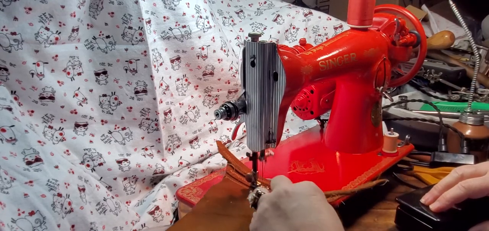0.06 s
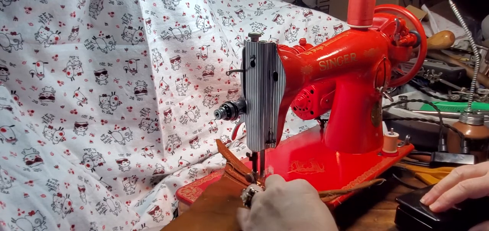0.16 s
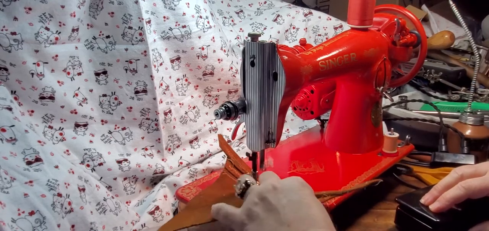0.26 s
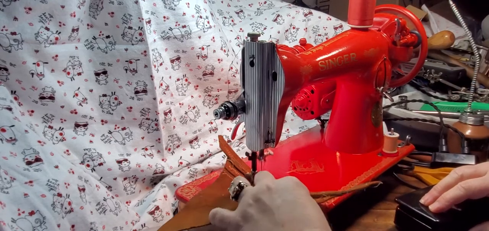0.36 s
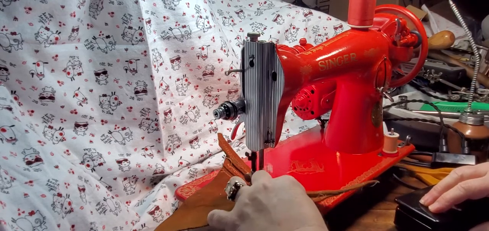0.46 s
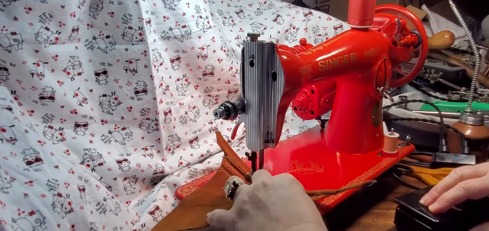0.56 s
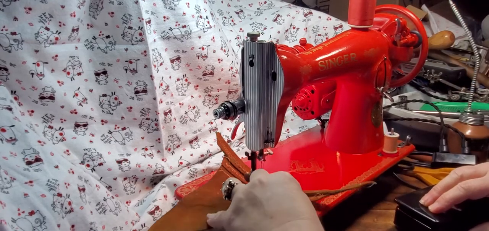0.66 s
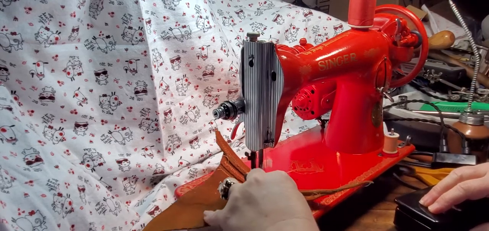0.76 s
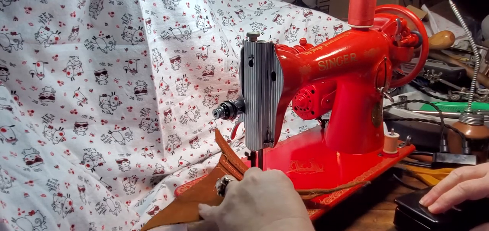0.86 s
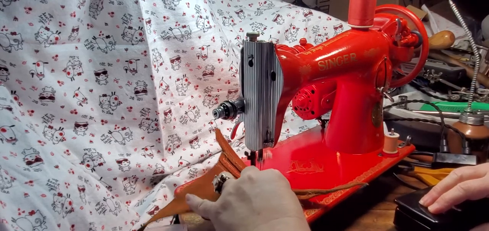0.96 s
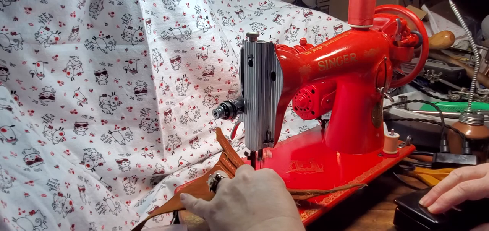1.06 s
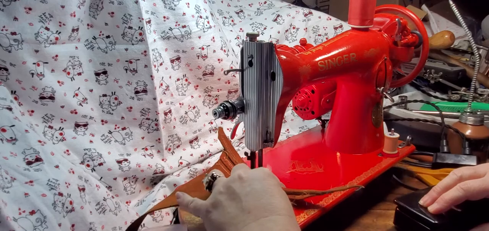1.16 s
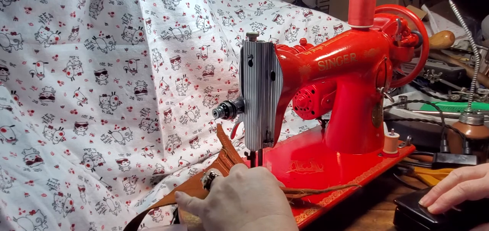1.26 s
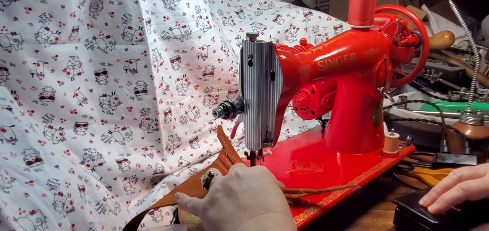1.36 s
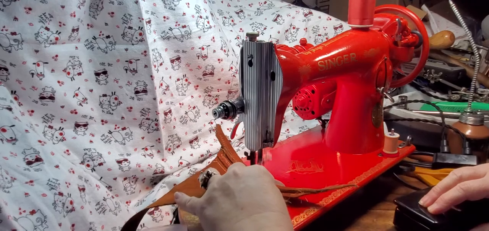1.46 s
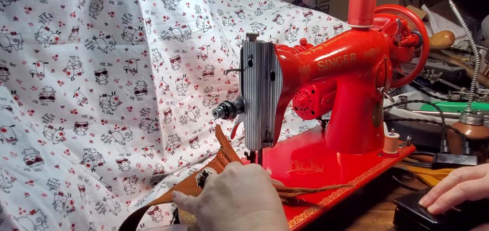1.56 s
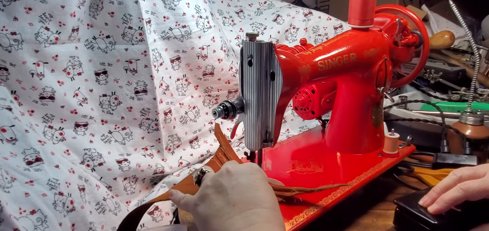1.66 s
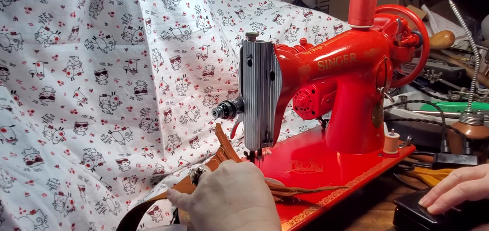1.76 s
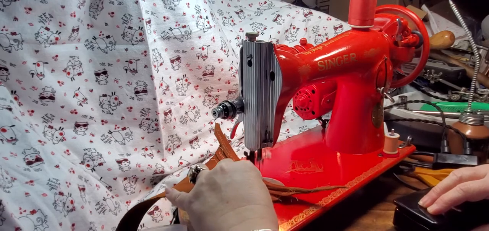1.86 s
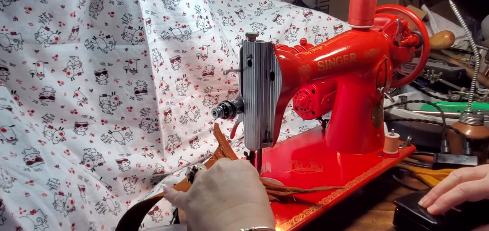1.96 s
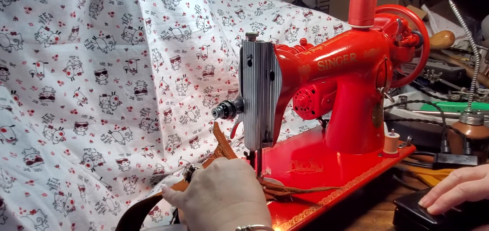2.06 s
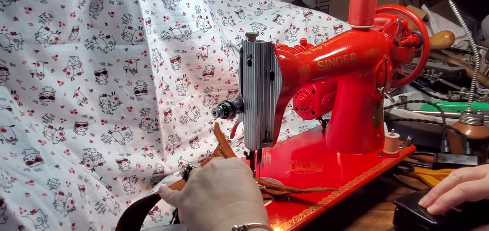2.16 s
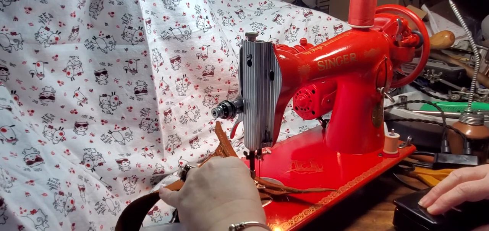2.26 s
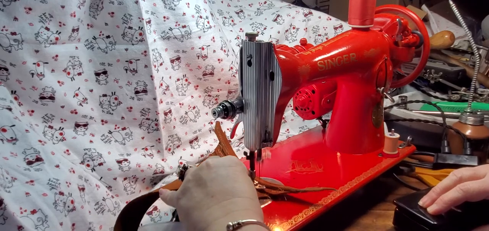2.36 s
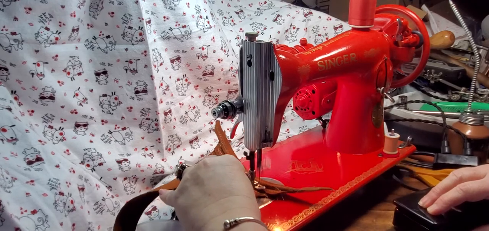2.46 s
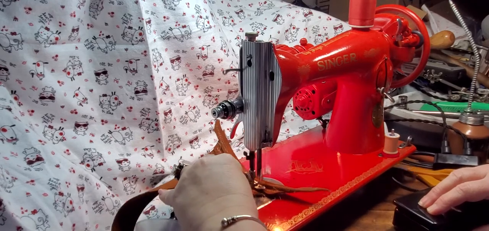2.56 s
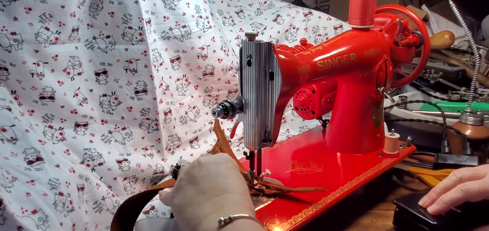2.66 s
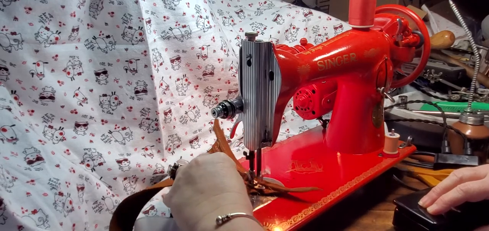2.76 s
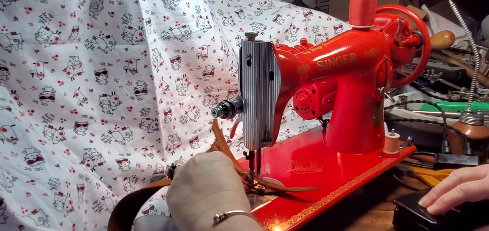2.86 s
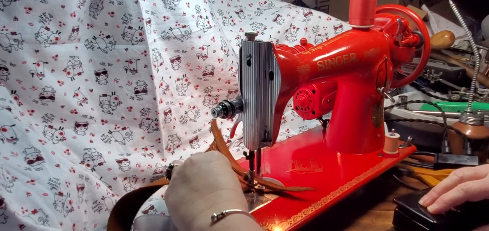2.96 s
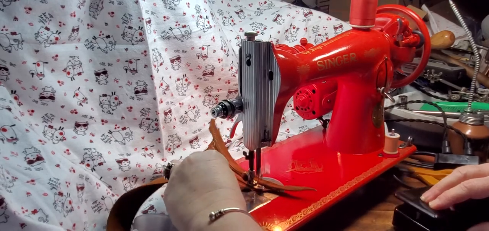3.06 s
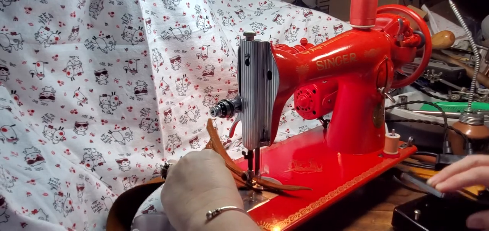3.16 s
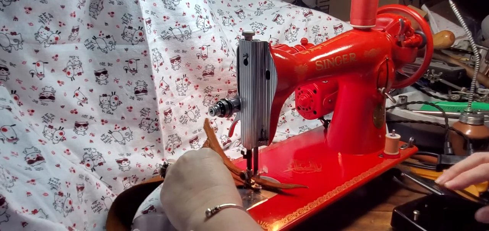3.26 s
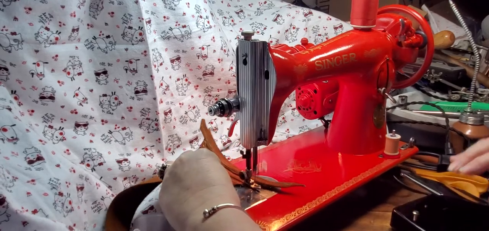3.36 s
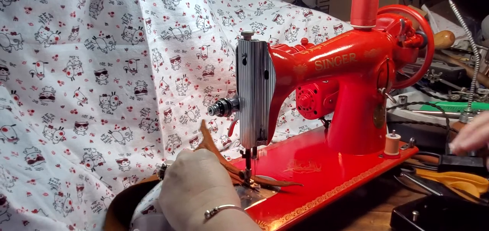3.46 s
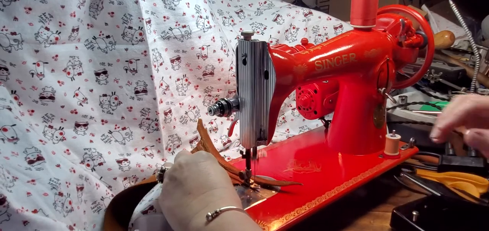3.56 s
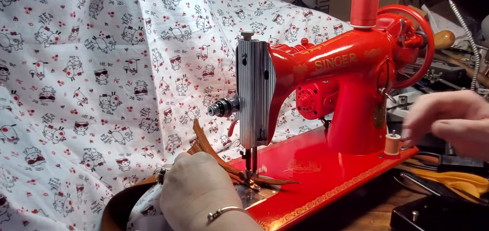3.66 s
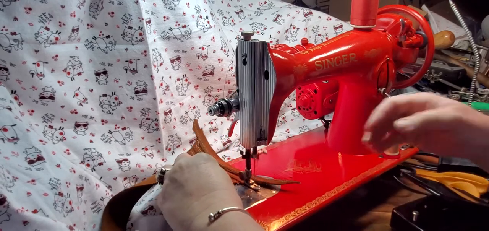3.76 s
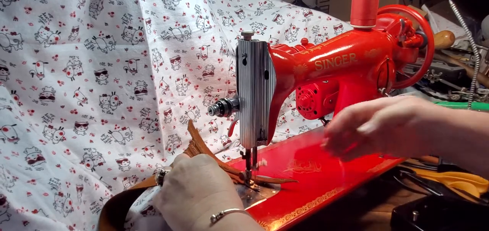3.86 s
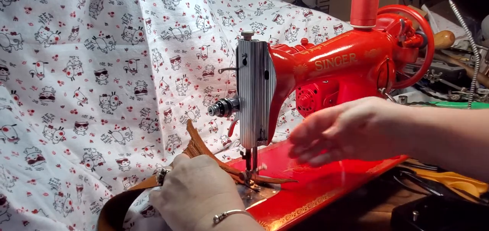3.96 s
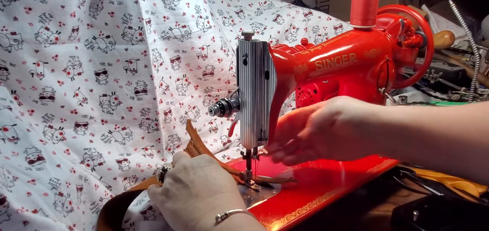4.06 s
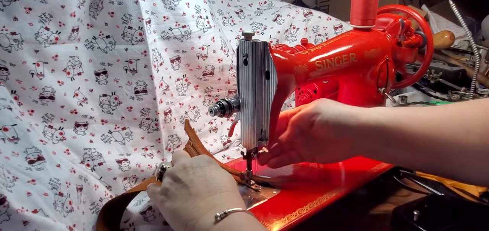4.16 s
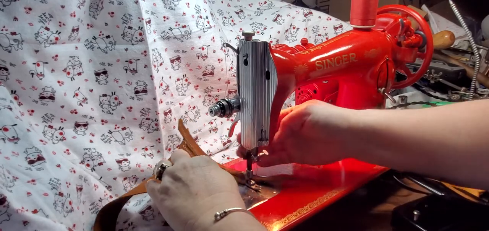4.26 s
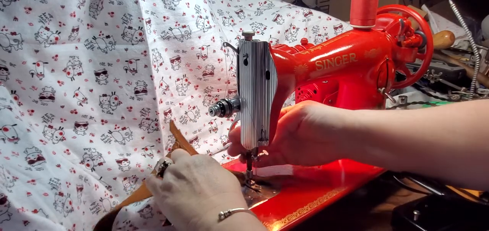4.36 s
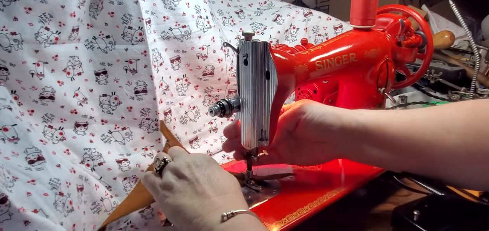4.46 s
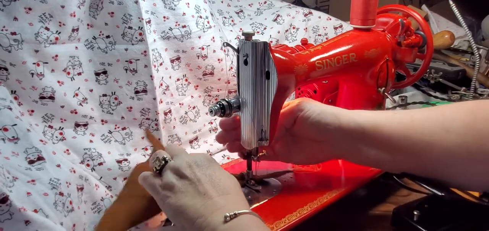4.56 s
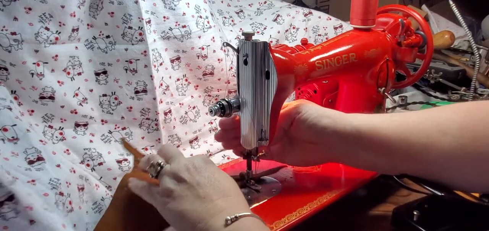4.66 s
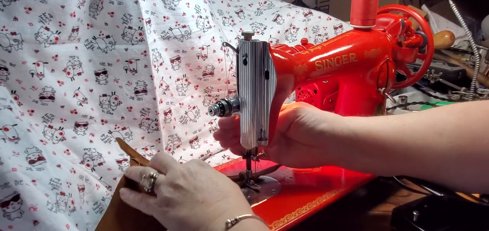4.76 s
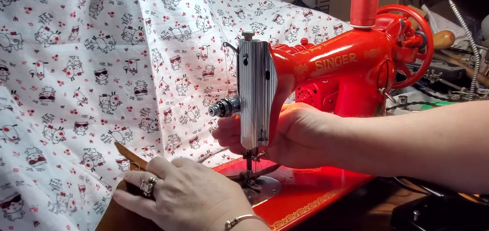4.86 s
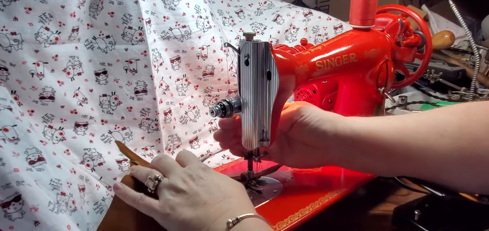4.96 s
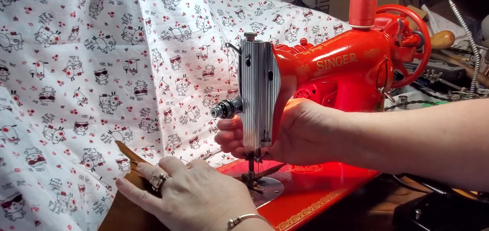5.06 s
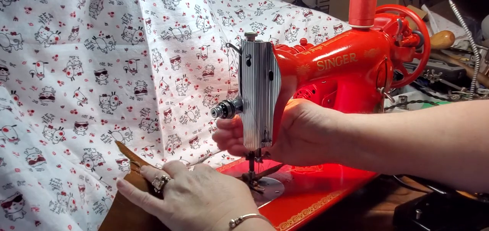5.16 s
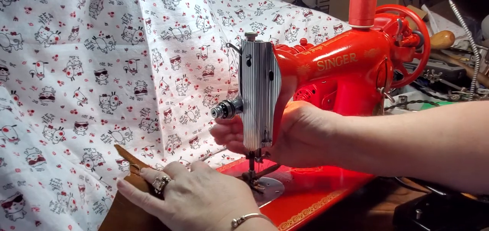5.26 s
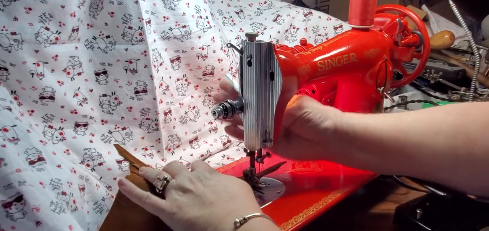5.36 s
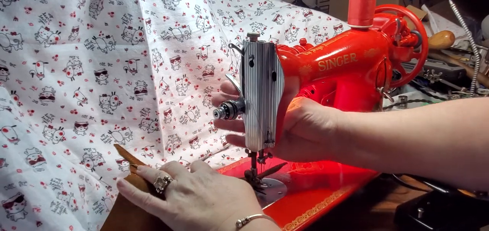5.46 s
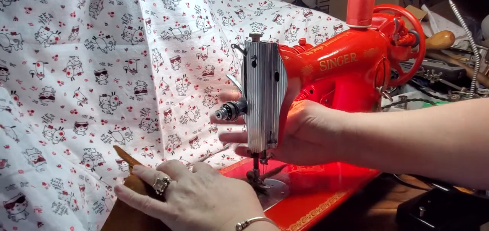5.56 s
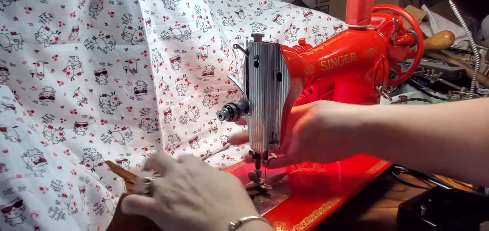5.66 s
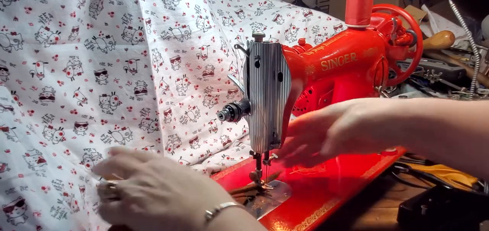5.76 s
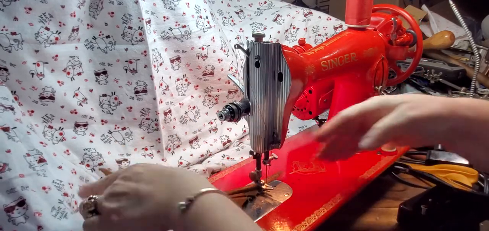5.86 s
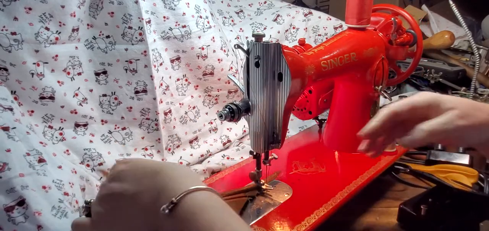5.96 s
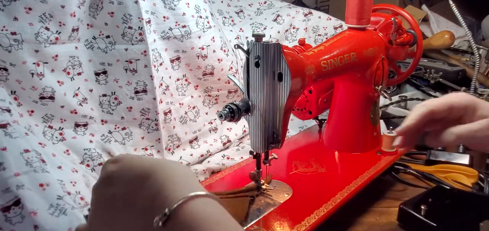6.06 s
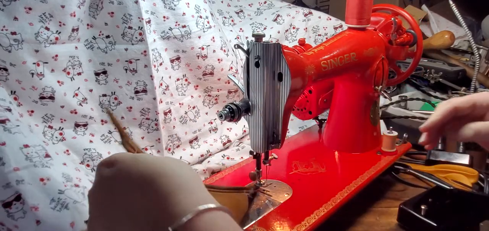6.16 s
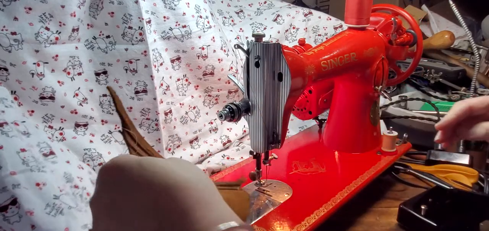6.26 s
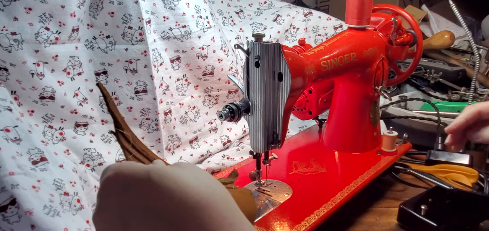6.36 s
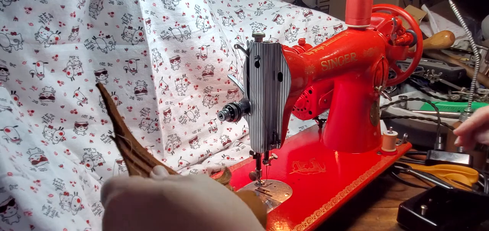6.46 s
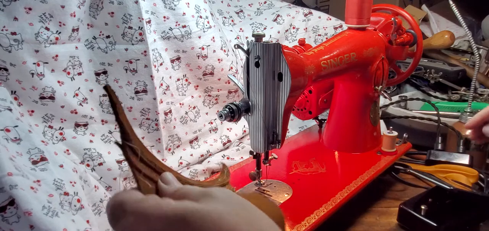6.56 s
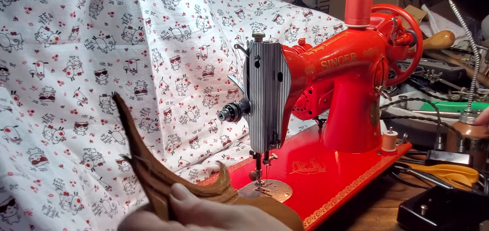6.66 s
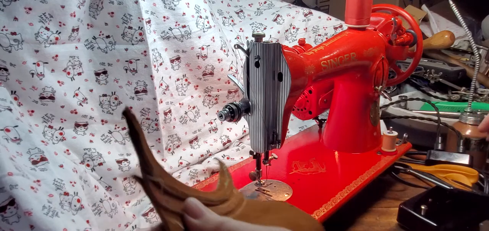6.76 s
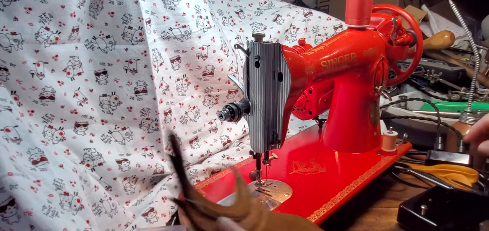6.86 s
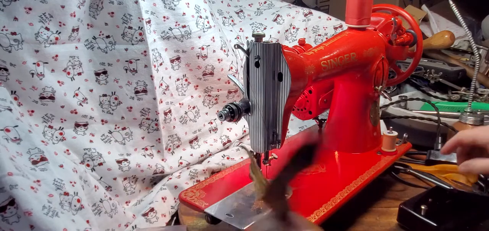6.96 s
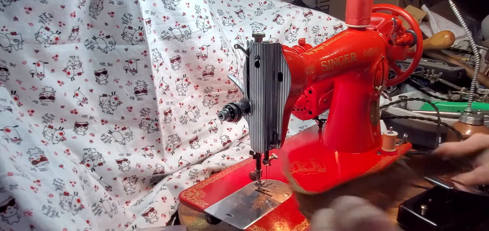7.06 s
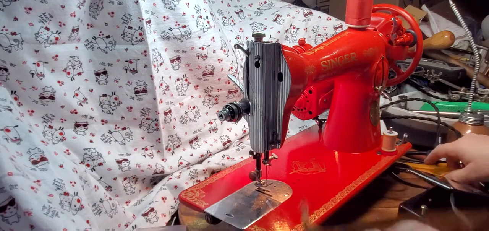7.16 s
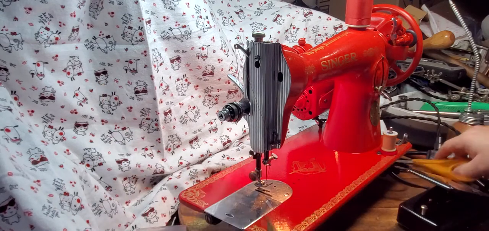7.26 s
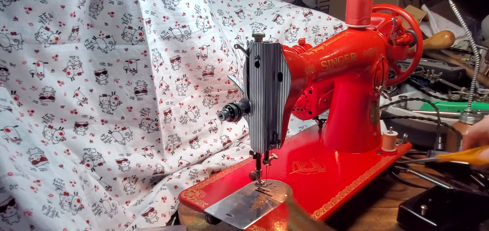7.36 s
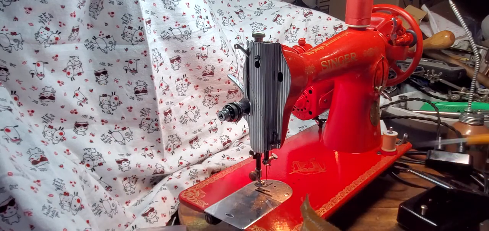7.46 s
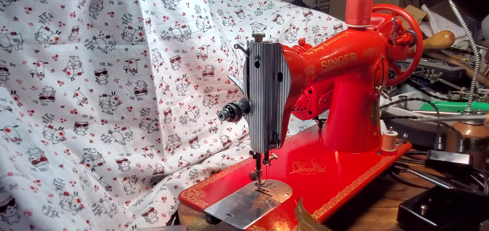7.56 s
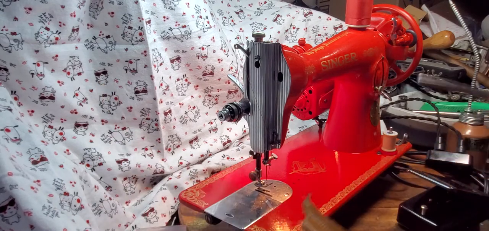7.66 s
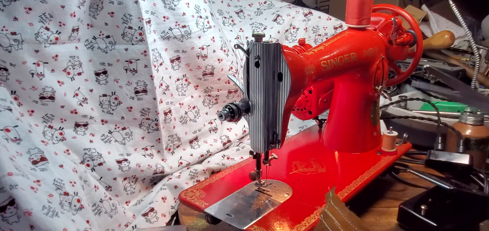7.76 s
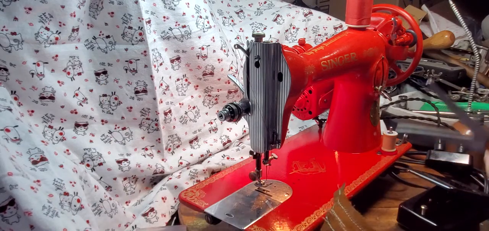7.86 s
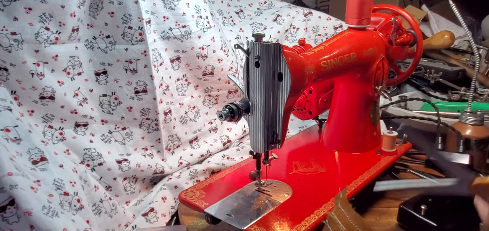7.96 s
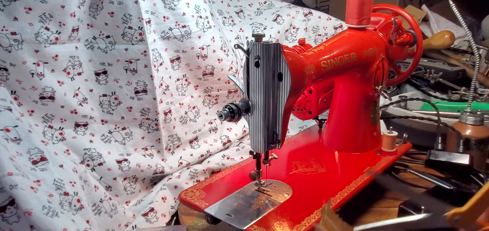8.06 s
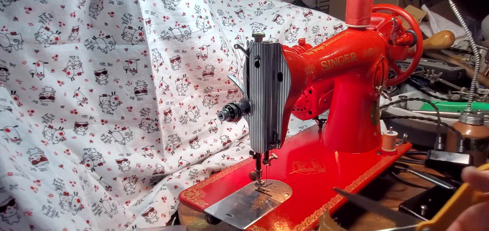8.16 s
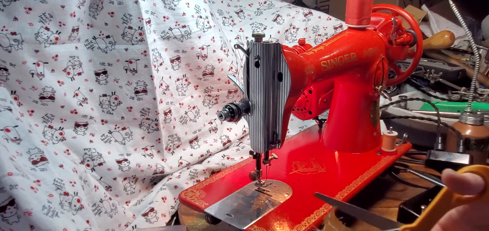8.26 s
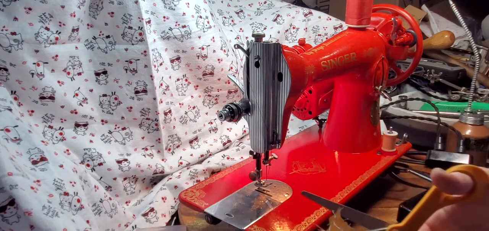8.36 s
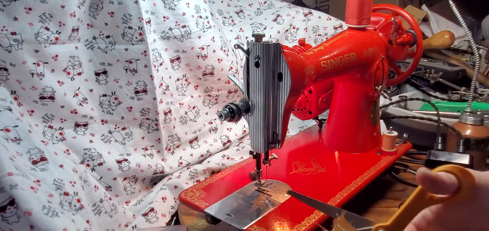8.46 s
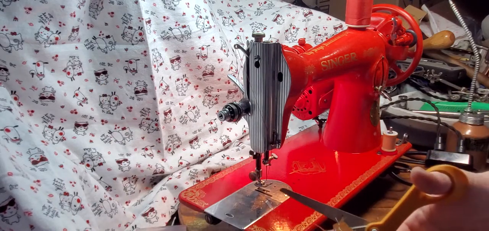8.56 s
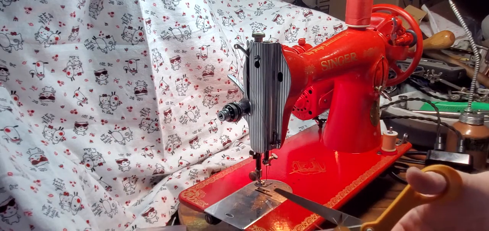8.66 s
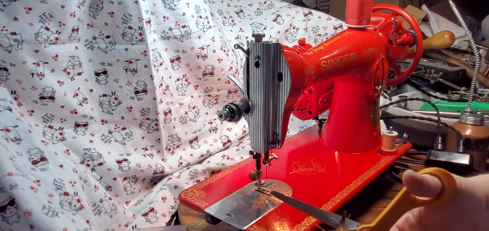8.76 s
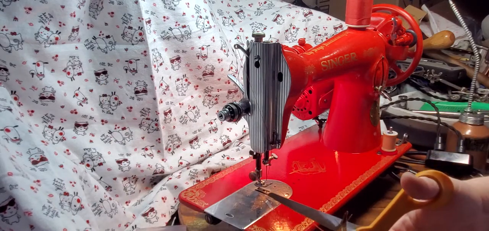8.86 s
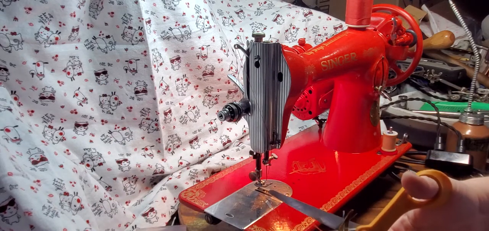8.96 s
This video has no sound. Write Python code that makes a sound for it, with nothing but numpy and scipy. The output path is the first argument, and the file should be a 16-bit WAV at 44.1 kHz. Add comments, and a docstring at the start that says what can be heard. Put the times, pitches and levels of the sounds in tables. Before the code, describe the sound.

Close up in a small room, a motor-driven cast-iron sewing machine stitches leather: clacking linkage, low needle thumps, gear rumble and a thin wavering whine. It gains speed for about three seconds, then coasts to rest in uneven knocks. Metal lever clicks and a hard snap follow, then faint bracelet scraping, a loud tool knock and a brief leather rustle. Quiet traffic rumble remains, picked up in stereo.

```python
"""Leather stitching on an old sewing machine

A cast-iron machine speeds up and coasts to a stop: linkage knocks and gear noise ring its iron
and steel resonances, the needle thumps the table and two motor tones waver.
Then a presser lever clicks, a bracelet slides, leather drags and tools knock: shaped noise and decaying modes.
Random-sign echoes make a small room; filtered noise and low tones make the far traffic rumble."""
import sys
import numpy as np
from scipy import signal
from scipy.fft import rfft, irfft, next_fast_len
from scipy.io import wavfile
from scipy.ndimage import uniform_filter1d

SR = 44100
rng = np.random.default_rng(int(sys.argv[2]) if len(sys.argv) > 2 else 0)


def pcm_store(signal):
    """Save signal as 16-bit PCM."""
    levels = np.round(np.clip(np.atleast_2d(signal), -1, 1) * 32767)
    wavfile.write(sys.argv[1], SR, levels.astype(np.int16).T)


N = 396885
T = np.arange(N) / SR


def amp(db):
    """Decibels to gain."""
    return 10 ** (np.asarray(db) / 20)


def evened(x):
    """Scales to rms 1."""
    return x / np.sqrt(np.mean(x ** 2) + 1e-20)


def white(rows=3):
    """White noise, one independent row per path."""
    return rng.standard_normal((rows, N))


def slow_noise(rows, length, window):
    """Rms-1 noise smoothed twice over window samples."""
    smooth = uniform_filter1d(rng.standard_normal((rows, length)), window)
    return evened(uniform_filter1d(smooth, window))


def read(points, hz):
    """Reads a spectrum table on a log-frequency axis."""
    f, value = np.transpose(points)
    return np.interp(np.log(hz + 1), np.log(f + 1), value)


def curve(rows, col, outside=-120):
    """Reads one column of a curve at every sample."""
    rows = np.array(rows)
    return np.interp(T, rows[:, 0], rows[:, col], outside, outside)


def filtered(x, gain):
    """Multiplies the spectrum by gain(hz), keeping white noise at the same rms."""
    size = next_fast_len(N + SR)
    g = gain(np.fft.rfftfreq(size, 1 / SR))
    return irfft(rfft(x, size) * g / np.sqrt(np.mean(abs(g) ** 2)), size)[..., :N]


def modes(table, hz):
    """Summed response of resonances (Hz, width, dB)."""
    return sum(amp(db) / (1 + 2j * (hz - f) / width) for f, width, db in table)


CREST_DB = 9  # a noisy blow peaks this far above its envelope


def train(times, dbs):
    """One spike for each blow."""
    out = np.zeros(N)
    at = np.clip((np.asarray(times) * SR).astype(int), 0, N - 1)
    np.add.at(out, at, amp(np.asarray(dbs) - CREST_DB))
    return out


def bursts(times, dbs, t60_s, rise_s):
    """Envelope of blows that build up with time constant rise_s and die away."""
    r = np.exp(-1 / (rise_s * SR))
    decaying = signal.lfilter([1], [1, -amp(-60 / (t60_s * SR))], train(times, dbs))
    return signal.lfilter([1 - r], [1, -r], decaying)


def knocks(times, dbs, kind, chatter_t60_s):
    """A firm contact, alike every time, then a chatter; only the part below or above 1 kHz."""
    contact = rng.standard_normal((3, 100)) * amp(-60 * T[:100] / .004)
    contact[:, 0] = 20 if kind == "low" else 2  # the low thud is one clean push
    contact /= np.linalg.norm(contact, axis=1)[:, None]
    contact = signal.oaconvolve(train(times, dbs)[None], contact, axes=1)[:, :N]
    chatter = bursts(times, dbs, chatter_t60_s, 0.0012) * white()
    return signal.lfilter(*signal.butter(2, 1000, kind, fs=SR), 7.3 * contact + 1.24 * chatter)


# one row per stitch at the shuttle tick, last row wheel at rest: (time [s], tick level [dB])
STITCHES = [(-0.032, -39), (0.1227, -25), (0.2747, -24), (0.421, -18), (0.5684, -25), (0.7115, -26),
            (0.853, -22), (0.9892, -20), (1.13, -33), (1.2677, -16), (1.4015, -43), (1.5353, -16),
            (1.669, -34), (1.8013, -18), (1.93, -12), (2.0567, -24), (2.183, -18), (2.3069, -23),
            (2.4304, -12.5), (2.5442, -47), (2.654, -24), (2.7635, -14), (2.865, -36), (2.972, -22),
            (3.072, -33), (3.168, -19), (3.264, -14), (3.372, -24), (3.494, -10.5), (3.628, -22),
            (3.82, -39), (4.181, -68)]
# linkage knocks in every turn: (position [share of a turn], low thud [dB], mid clack [dB], treble [dB],
# thud gain at full force [dB], clack and treble gain at full force [dB])
LINKAGE = [(0.025, -26, -38.5, -72, 9.5, 18.5), (0.236, -26, -25.5, -53, 5.5, 8),
           (0.378, -70, -70, -38, 0, 13), (0.406, -20, -29.5, -60, -8.5, -7),
           (0.519, -27.5, -25, -31, -5.5, -7.5), (0.596, -30.5, -32.5, -59, -2, -1),
           (0.805, -35, -37, -40, 18.5, 17.5)]
# knocks listed one by one, a few hard ones at speed, most as the wheel coasts:
# (time [s], body level [dB], treble level [dB])
LISTED_KNOCKS = [(2.7986, -40, -16), (3.2, -15, -11), (3.494, -18.5, -30), (3.605, -34.5, -37),
                 (3.639, -33.5, -22), (3.683, -30, -38), (3.737, -35.5, -30), (3.783, -34, -26),
                 (3.823, -33, -36), (3.841, -37.5, -23), (3.86, -32.5, -23), (3.91, -34, -36),
                 (3.964, -35.5, -54), (3.977, -39.5, -53), (3.991, -44, -41), (4.042, -37, -43)]
PLAY_TURN, PLAY_DB = 0.005, 1.3  # spread of each knock from loose joints
COAST_S = 3.59  # from here the slowing wheel's knocks are listed one by one


def linkage():
    """Loose joints knock at set points of each turn: returns body knocks and treble envelope."""
    tick_s, tick_db = np.transpose(STITCHES[:-1])
    turn_s = np.diff(np.transpose(STITCHES)[0])
    force = curve(DRIVE, 3, outside=0)
    share, thud_db, clack_db, treble_db, grow_db, sharpen_db = np.transpose(LINKAGE)
    play = rng.standard_normal((3, len(tick_s), len(share)))
    loose_s = tick_s[:, None] + turn_s[:, None] * (share + PLAY_TURN * play[0])
    loose_s = np.clip(loose_s, 0, None)
    chance_db = PLAY_DB * play[1] - 40 * (loose_s > COAST_S)
    force_then = force[(loose_s * SR).astype(int)]
    swell_db = grow_db * force_then + chance_db
    bright_db = sharpen_db * force_then + chance_db

    listed_s, listed_db, snap_db = np.transpose(LISTED_KNOCKS)
    body = np.zeros((3, N))
    for level_db, kind in [(thud_db + swell_db, "low"), (clack_db + bright_db, "high")]:
        body += knocks(loose_s.ravel(), level_db.ravel(), kind, 0.03)
        body += knocks(listed_s, listed_db, kind, 0.08)

    loose_db = treble_db + bright_db + 1.7 * PLAY_DB * play[2]
    times = [*loose_s.ravel(), *tick_s, *listed_s]
    levels = [*loose_db.ravel(), *tick_db, *snap_db]
    return body, bursts(times, levels, 0.016, 0.0043)


def turns_done():
    """Turns of the wheel since the first stitch."""
    return np.interp(T, np.transpose(STITCHES)[0], np.arange(len(STITCHES)))


# (time [s], gear rumble [dB], motor brush hiss [dB], force on the linkage [0-1])
DRIVE = [(0.0, -48, -43, 0), (1.6, -44, -42, 0.32), (2.45, -42.5, -41.5, 0.5), (3.0, -38.5, -40.5, 0.86),
         (3.2, -40, -41, 1), (3.48, -43.5, -51, 0.78), (3.58, -49.5, -51.5, 0.8), (4.05, -62, -67, 0.3),
         (4.2, -56, -92, 0)]
ENGAGE_TURN = 0.79  # load comes on at once
SLACK_TURN = 0.62  # turns after engaging until the linkage runs slack


def running_noise():
    """Gears and brushes chatter with the load, loose pins click: body and treble envelopes."""
    force = curve(DRIVE, 3, outside=0)
    loaded_turn = (turns_done() - ENGAGE_TURN) % 1
    slack = np.clip((loaded_turn - SLACK_TURN) / 0.27, 0, 1)
    load = (0.4 - 1.08 * slack) * (4.0 + 13.6 * abs(force))  # swings more under force
    grit = evened(uniform_filter1d(white(2), 120))
    pins = amp(2.5 * np.minimum(rng.exponential(1, N), 3)) * (rng.random(N) < 120 / SR)  # 120 per s
    pins = amp(curve(DRIVE, 1) - 4.5) * signal.lfilter([1], [1, -.99], pins)
    rumble_db = curve(DRIVE, 1) - 0.16 - 2.7 * force + 0.57 * load + 0.83 * grit[0]
    brush_db = curve(DRIVE, 2) + 0.2 * load + 0.5 * grit[1]
    return pins + amp(rumble_db), 0.6 * pins + amp(brush_db)


# table top modes: (frequency [Hz], level [dB], t60 [s])
TABLE_MODES = [(130.2, 58, 0.091), (82.5, -21, 0.15)]
THUMP_TURN, THUMP_DB, THUMP_FADE_DB = 0.1554, -32, -5  # landing point; fade applies at full force
SOFT_S, MOTOR_OFF_S = 2.31, 3.45  # one soft stitch; motor stops


def needle_thumps():
    """The needle lands once a stitch and the table top answers with decaying sines."""
    tick_s = np.transpose(STITCHES[:-1])[0]
    turn_s = np.diff(np.transpose(STITCHES)[0])
    force = curve(DRIVE, 3, outside=0)
    t = T[:SR // 4]
    thud = sum(np.sin(2 * np.pi * hz * t) * amp(db - 60 * t / t60) for hz, db, t60 in TABLE_MODES)
    thud = thud * (1 - np.exp(-t / 0.0036))
    land = (np.clip(tick_s + THUMP_TURN * turn_s, 0, None) * SR).astype(int)
    # slow turns land weakly, more so with the motor off
    momentum_db = 45 * np.log10(np.clip(.155 / turn_s, 0, 1)) - 14 * (tick_s > MOTOR_OFF_S)
    soft_db = -20 * (abs(tick_s - SOFT_S) < .05)
    chance_db = 0.25 * rng.standard_normal(len(tick_s))
    blows = np.zeros(N)
    blows[land] = amp(THUMP_DB + THUMP_FADE_DB * force[land] + momentum_db + soft_db + chance_db)
    return signal.oaconvolve(blows, thud / thud.max())[:N]


def ringing(x, colour, table, sway_db, window):
    """Broad colour plus resonances that each come and go, smoothed over window samples."""
    live_n = 5 * SR  # resonances act on the first 5 s
    hz = np.fft.rfftfreq(8192, 1 / SR)
    sway = amp(sway_db * slow_noise(len(table), live_n, window) - .115 * sway_db ** 2)
    out = x.copy()
    for gain, (f, width, db) in zip(sway, table):
        r = np.exp(-np.pi * width / SR)
        pole = r * np.exp(2j * np.pi * f / SR)
        ring = signal.lfilter([1 - r], [1, -pole], gain * x[:, :live_n]).real
        out[:, :live_n] += 2 * amp(db) * ring
    broad = amp(read(colour, hz))
    level = np.linalg.norm(broad) / np.linalg.norm(broad * (1 + modes(table, hz)))
    return level * filtered(out, lambda f: amp(read(colour, f)))


# broad colour of the iron body: (frequency [Hz], level [dB])
IRON = [(88, -3.5), (150, 0), (204, -7.5), (596, -7.5), (900, -8), (1150, -5), (1570, -6.5), (3300, -11),
        (6500, -21), (11000, -120)]
# iron body resonances: (frequency [Hz], width [Hz], level [dB])
IRON_MODES = [(445, 70, 1), (712, 40, 8), (752, 45, 4.5), (1140, 60, -2), (1373, 50, 0), (1980, 280, -5),
              (2600, 350, -3), (3135, 90, 3)]
# colour of ticks and brush hiss: (frequency [Hz], level [dB])
HISS = [(2060, -29), (3500, 2), (5410, 0), (7190, -1.5), (8240, 2), (15200, 1.5), (16200, 1)]
# small steel parts: (frequency [Hz], width [Hz], level [dB])
HISS_MODES = [(8410, 190, -2.5), (9890, 250, 0), (10500, 150, -3.5), (11700, 260, -5), (12760, 260, -1),
              (15760, 170, 4)]


def machine():
    """Knocks and running noise shake the iron body and steel parts; the needle thumps the table."""
    knocked, snaps = linkage()
    body_noise, treble_noise = running_noise()
    body = knocked + body_noise * white()
    treble = (snaps + treble_noise) * white()
    iron = ringing(body, IRON, IRON_MODES, 1.6, window=900)
    steel = ringing(treble, HISS, HISS_MODES, 5.3, window=500)
    return iron + steel + needle_thumps()


# motor whine: (time [s], high tone [Hz], high level [dB], low level [dB])
WHINE = [(0, 6290, -62, -50.5), (1.7, 6070, -61, -55), (3.3, 6030, -62, -57), (3.45, 5900, -84, -70)]
LOW_SHARE = .186  # low tone / high tone
BELT_STITCHES, BELT_START = 1.595, .3  # stitches per belt turn, start [stitches]
WHINE_WAVER, WHINE_SWING, WHINE_FLICKER_DB = .009, 0.016, 3.5  # pitch depths as shares; level rms


def whine():
    """Two unsteady motor tones that jump up and sag back with each turn of the belt."""
    slow = slow_noise(3, N, 900)
    belt = 2 * np.pi * (turns_done() - BELT_START) / BELT_STITCHES + 1
    swing = np.sin(belt) + 0.53 * np.sin(2 * belt)
    hz = curve(WHINE, 1, outside=6000) * (1 + WHINE_WAVER * slow[0] + WHINE_SWING * swing)
    phase = 2 * np.pi * np.cumsum(hz) / SR
    high = np.sin(phase + np.array([[0], [1.], [2.5]]))  # row phases [rad]
    high = amp(curve(WHINE, 2) + WHINE_FLICKER_DB * slow[1]) * high
    low = amp(curve(WHINE, 3) + WHINE_FLICKER_DB * slow[2]) * np.sin(LOW_SHARE * phase)
    return np.sqrt(2) * (high + low)


def hits(rows, rings, knock_db, crack_t60_s, dull_hz, crack_hz):
    """Each blow is a dull knock with a rattle, a bright crack and rough decaying modes."""
    out, t = np.zeros((3, N + SR)), T[:SR // 4]
    knock_filter = signal.butter(4, [650, dull_hz], "band", fs=SR, output="sos")
    crack_filter = signal.butter(2, [4000, crack_hz], "band", fs=SR)
    knock_env = amp(-60 * t / 0.0094) + amp(-23 - 60 * t / 0.13)
    crack_env = amp(-60 * t / crack_t60_s) + amp(-28.0 - 60 * t / 0.76)
    push_env = amp(-60 * t / 0.012) + amp(-24 - 60 * t / 0.13)
    for s, blow_db, crack_db, side_db in rows:
        noise = rng.standard_normal((3, 3, len(t)))
        knock = signal.sosfilt(knock_filter, noise[0] * knock_env)
        sound = amp(blow_db + knock_db) * knock / abs(knock).max()
        sound += amp(crack_db - 4.5) * signal.lfilter(*crack_filter, noise[1]) * crack_env

        push = noise[2] * push_env  # parts chatter, so the rings are rough
        push[:, 0] = 14.  # first contact
        push /= np.linalg.norm(push, axis=1)[:, None]
        ring = np.zeros(len(t))
        for hz, db, t60 in rings:
            level_db = blow_db if hz < 4500 else crack_db
            ring += amp(level_db + db - 12.0 - 60 * t / t60) * np.sin(2 * np.pi * hz * t)
        sound += signal.fftconvolve(push, ring[None], axes=1)[:, :len(t)]
        out[:, int(s * SR):][:, :len(t)] += sound * amp([[0], [side_db], [-side_db]])
    return out[:, :N]


# blows: (time [s], blow level [dB], crack level [dB], scattered sound left +, right - [dB])
# modes: (frequency [Hz], level [dB], t60 [s])
# presser lever
LEVER = [(4.547, -24, -28.5, 0.5), (4.66, -44.5, -62, 7), (5.02, -42, -52.5, -1), (5.33, -37, -56, 1),
         (5.359, -23.5, -40.5, 0), (5.469, -41, -49, 2), (5.488, -25.5, -47, -1)]  # blow columns
LEVER_MODES = [(1176, -6, 0.045), (2112, 1.5, 0.062), (3640, -13, 0.017), (7100, 5, 0.02),
               (8640, 10, 0.018)]  # mode columns
# presser foot snapping down
FOOT = [(5.3845, -36, -28, 1), (5.3885, -10, -29, 1)]  # blow columns
FOOT_MODES = [(740, -2, .06), (1250, -3, .04), (2120, 2, .04), (2900, 0, .022), (4800, -4, .025),
              (8600, -3, .02)]  # mode columns
# plate
PLATE = [(4.146, -19.5, -31.5, 2), (4.181, -34, -58, 4), (4.2, -36, -40, 1), (6.224, -38, -26.5, 2.5)]  # blow columns
PLATE_MODES = [(480, -2, .03), (750, -3, .03), (1120, -1, .03), (1380, -7, .07), (1650, -3, .03),
               (2820, -12, .03), (6480, -5, .07), (10100, -6, .06), (12400, -6, .06), (14200, -6, .06)]  # mode columns
# tools on the table
TOOL = [(7.040, -9.5, -58, 1.9), (7.136, -32.5, -70, 0.33), (7.185, -19, -31.5, 0.42)]  # blow columns
TOOL_MODES = [(730, -13.5, 0.16), (990, -11, 0.063), (1325, -1, 0.034), (1540, 0.5, 0.053),
              (2120, -12, 0.086), (2590, -4.5, 0.055), (3230, -13, 0.084)]  # mode columns
# dull taps on the wooden case
TAPS = [(4.736, -41, -49, 3.9), (5.608, -37, -43, 3.4), (6.226, -30, -60, 2.1)]  # blow columns
TAP_MODES = [(540, 4, .045)]  # mode columns


def handled_things():
    """Lever, foot, plate, tools and case: each set of blows rings its own modes."""
    out = hits(LEVER, LEVER_MODES, -5.0, 0.043, 3400, 14000)
    out += hits(FOOT, FOOT_MODES, 0.8, 0.092, 3950, 17000)
    out += hits(PLATE, PLATE_MODES, -0.092, 0.039, 2040, 11200)
    out += hits(TOOL, TOOL_MODES, 0.091, 0.014, 3760, 9900)
    return out + hits(TAPS, TAP_MODES, -0.35, 0.041, 2500, 8400)


# bracelet slides: (start [s], end [s], level [dB])
CHAIN = [(6.11, 6.267, -57), (6.312, 6.807, -57.5), (7.676, 7.82, -63.5)]
# link resonances: (frequency [Hz], width [Hz], level [dB])
LINKS = [(5930, 80, -13), (8470, 110, -2), (9050, 130, -8), (10700, 240, -2), (12700, 140, -4)]
# single chain taps: (time [s], level [dB])
TINKLES = [(6.11, -26.5), (6.1913, -45), (6.424, -51), (6.508, -51), (6.535, -44), (6.6268, -34)]
SLIDE_EDGE_S, SLIDE_RISE_DB_PER_S = 0.051, 2
SLEEVE_DB = -3.5  # dull brushing of the arm, relative to the slide


def bracelet():
    """Scrape and tiny taps ring the chain links, each link coming and going by itself."""
    slide = np.zeros(N)
    for start, end, db in CHAIN:
        fade = np.clip(np.minimum(T - start, end - T) / SLIDE_EDGE_S + .5, 0, 1) ** 2
        slide += amp(db + SLIDE_RISE_DB_PER_S * (T - end)) * fade
    taps = amp(2.0 * rng.exponential(1, N)) * (rng.random(N) < 110 / SR)  # 110 per s
    grain = 0.84 + 0.48 * evened(signal.lfilter([1], [1, -.98], taps))
    tinkle_s, tinkle_db = np.transpose(TINKLES)
    drive = (slide * grain + bursts(tinkle_s, tinkle_db, 0.039, .0003)) * white()

    near = slice(6 * SR, 8 * SR)  # links ring only here
    touch = np.zeros((len(LINKS), 1, N))
    touch[:, 0, near] = amp(4.0 * slow_noise(len(LINKS), 2 * SR, 800) - 3.5)
    rings = np.zeros((3, N))
    for gain, (hz, width, db) in zip(touch, LINKS):
        rings += amp(db - 13.0) * gain * filtered(drive, lambda f: modes([(hz, width, 0)], f))
    brush = filtered(slide * white(), lambda f: modes([(2070, 2000, 0)], f))
    scrape = filtered(drive, lambda f: f ** 2 / (f ** 2 + 6000 ** 2))
    return rings + amp(SLEEVE_DB) * brush + amp(-11.0) * scrape


# leather drags over the table: (time [s], level [dB])
RUSTLES = [(7.29, -43), (7.325, -47)]


def rustles():
    """Leather drags: short bursts of dull noise around 1220 Hz that start abruptly and die away."""
    s, db = np.transpose(RUSTLES)
    drag = bursts(s, db, 0.23, 0.0015) * white()
    return filtered(drag, lambda hz: modes([(1220, 560, 0)], hz))


# soft low thuds through the floor: (time [s], level [dB])
BOOMS = [(3.22, -43), (5.15, -42)]


def booms():
    """Thuds through the floor: 42 Hz under a Gaussian swell."""
    tone = np.sin(2 * np.pi * 42 * T)
    return sum(amp(db) * np.exp(-((T - s) / 0.021) ** 2) * tone for s, db in BOOMS)


def echoes(x, t60_s):
    """A random-sign reflection every 20 samples, different per side; t60_s holds at 4.5 kHz, less above."""
    taps = np.zeros((2, SR // 2))
    at = np.arange(60, SR // 2 - 20, 20) + rng.integers(0, 20, (2, (SR // 2 - 61) // 20))
    np.put_along_axis(taps, at, rng.choice([-1., 1.], at.shape), 1)
    hz, t, z = signal.stft(taps, SR, nperseg=128)
    decay = amp(-60 * t / t60_s * (0.5 + hz[:, None] / 9000))
    tail = signal.istft(z * decay, SR, nperseg=128)[1]
    return signal.oaconvolve(x * np.ones((2, 1)), tail / np.linalg.norm(tail[0]), axes=1)[:, :N]


# power common to both ports: (frequency [Hz], share [0-1])
DIRECT = [(300, 1), (700, 1), (1500, 0.53), (3000, 0.2), (8000, 0.065)]
# left lead over right: (frequency [Hz], phase [rad])
PORT_PHASE = [(1700, 0), (4000, -3), (6600, -7.2)]
# left over right: (frequency [Hz], level [dB])
PORT_DB = [(180, 2), (550, 0), (4970, 2), (15000, -1)]


def ports(x):
    """Two microphone ports: row 0 reaches both phase-shifted, rows 1 and 2 scatter into one each."""
    size, side = next_fast_len(N + SR), np.array([[.5], [-.5]])
    hz = np.fft.rfftfreq(size, 1 / SR)
    direct, z = np.clip(read(DIRECT, hz), 0, 1), rfft(x, size)
    common = np.sqrt(direct) * np.exp(1j * side * read(PORT_PHASE, hz)) * z[0]
    scattered = np.sqrt(1 - direct) * z[1:]
    return irfft((common + scattered) * amp(side * read(PORT_DB, hz)), size)[:, :N]


# wavering low tones, perhaps far engines: (start [s], end [s], from [Hz], to [Hz], level [dB])
DRONES = [(5.9, 9.2, 69, 81, -56), (7.3, 8.7, 118, 143, -55), (5.95, 6.38, 122, 136, -53),
          (5.95, 6.55, 194, 200, -57), (6.6, 7.3, 201, 195, -53)]


def drones():
    """Gliding low sines with unsteady pitch swell and fade."""
    out = np.zeros(N)
    for start, end, from_hz, to_hz, db in DRONES:
        way = np.clip((T - start) / (end - start), 0, 1)
        waver = 1 + 0.0121 * evened(uniform_filter1d(rng.standard_normal(N), 3000))
        turns = np.cumsum((from_hz + (to_hz - from_hz) * way) * waver) / SR
        out += amp(db) * np.sin(np.pi * way) ** 0.52 * np.sqrt(2) * np.sin(2 * np.pi * turns)
    return out


# relative spectrum of the room noise: (frequency [Hz], level [dB])
ROOM_TONE = [(22, -49), (38, -4.5), (129, -5.5), (269, -13), (305, -20.5), (482, -24), (844, -23.5),
             (1440, -27), (2450, -30.5), (5390, -44.5), (9000, -51), (15300, -51.5), (16500, -40)]
# (frequency [Hz], left-right likeness [0-1])
ROOM_SAME = [(60, 0.93), (200, 0.98), (500, 0.67), (1500, 0.011)]
ROOM_DB = -48  # overall rms


def room_tone():
    """Traffic rumble through the walls, faint air and microphone hiss: patchy coloured noise."""
    frames, hz = N // 512 + 5, np.fft.rfftfreq(2048, 1 / SR)
    a, b, c, d, patches = rng.standard_normal((frames, 1025, 5)).T
    patches = evened(uniform_filter1d(uniform_filter1d(patches, 6, 0), 12, 1))
    same = np.clip(read(ROOM_SAME, hz), -1, 1)[:, None]
    left = a + 1j * b
    right = same * left + np.sqrt(1 - same ** 2) * (c + 1j * d)
    z = np.array([left, right]) * amp(read(ROOM_TONE, hz)[:, None] + 2.22 * patches)
    return amp(ROOM_DB) * evened(signal.istft(z, nperseg=2048, noverlap=1536)[1][:, :N])


def scene():
    """Machine, handled things and room."""
    run = machine() + whine()
    handled = handled_things()
    near = ports(run + handled + bracelet() + rustles())
    far = amp(-8) * echoes(handled[0], 0.33) + amp(-9) * echoes(run[0], 0.15)
    far = signal.lfilter(*signal.butter(2, 250, "high", fs=SR), far)  # little bass in the echoes
    return near + far + booms() + drones() + room_tone()


EDGE_HZ = 15900


def record(dry):
    """Bass roll-off of the microphone, then the band limit of the recorder."""
    rolled = signal.lfilter(*signal.butter(4, 38, "high", fs=SR), dry)
    band_limit = signal.firwin(1023, EDGE_HZ, window=("kaiser", 9), fs=SR)
    return signal.oaconvolve(rolled, band_limit[None], "same")


dry = scene()
out = record(dry)
pcm_store(out)
```